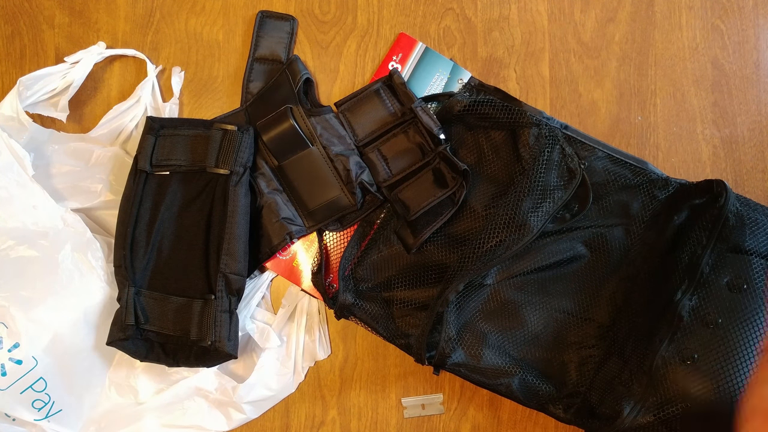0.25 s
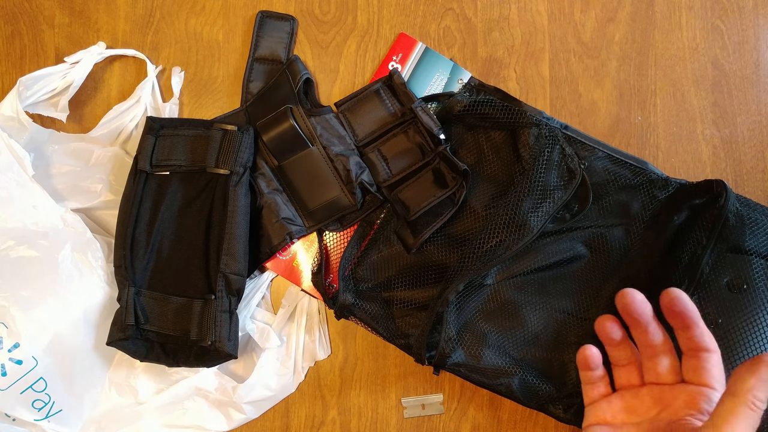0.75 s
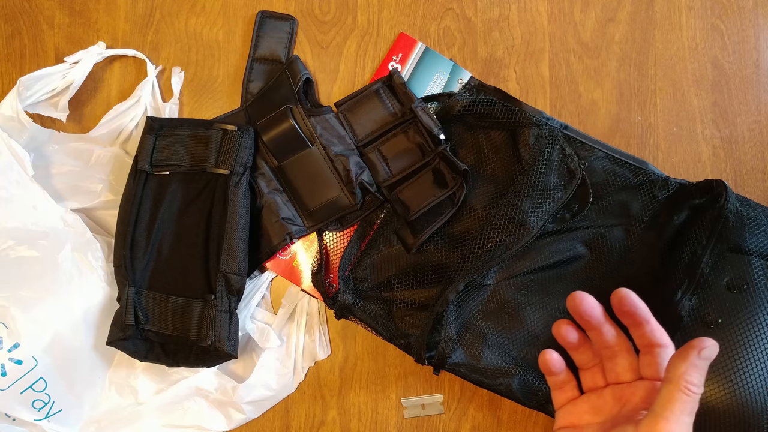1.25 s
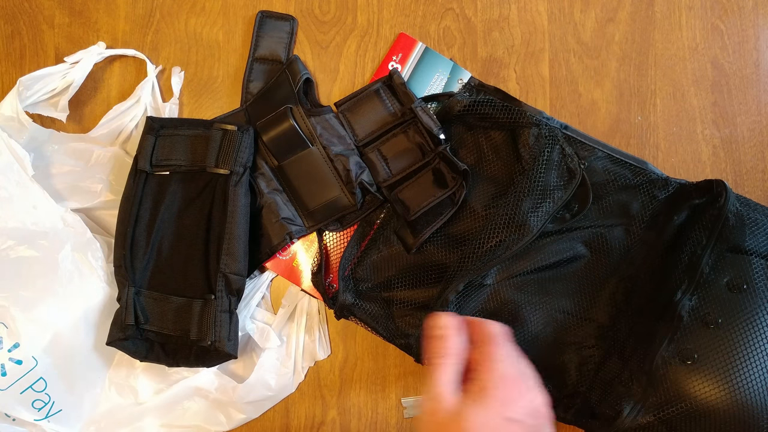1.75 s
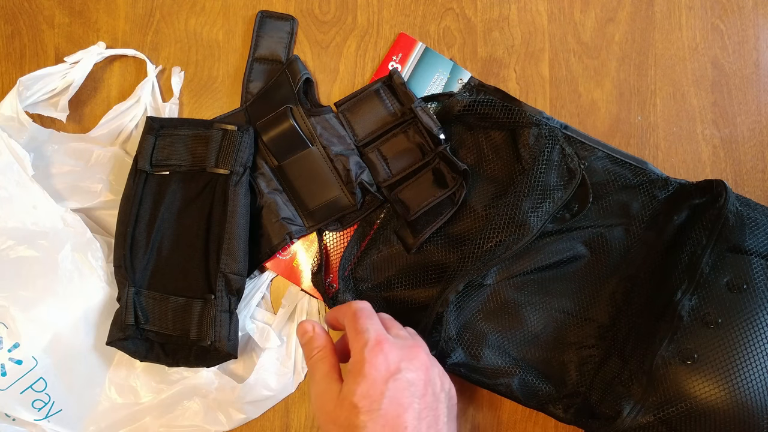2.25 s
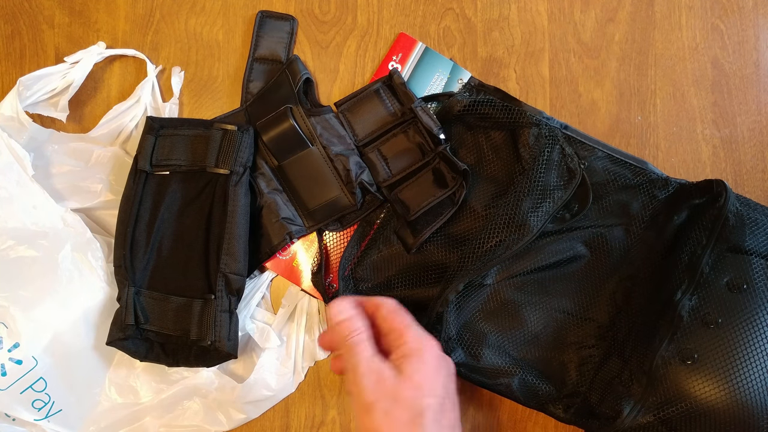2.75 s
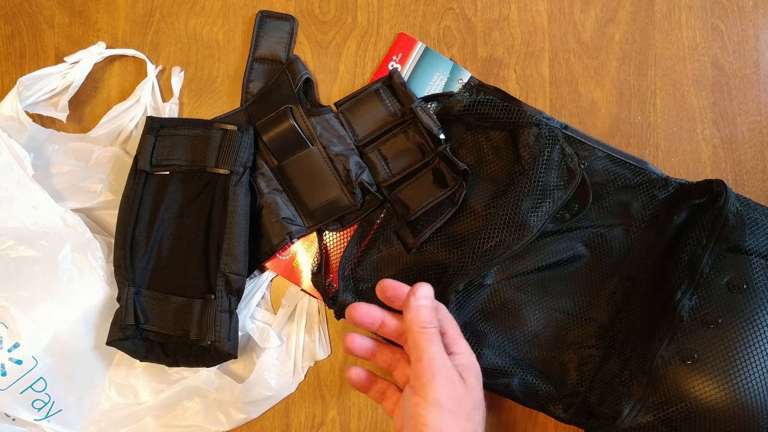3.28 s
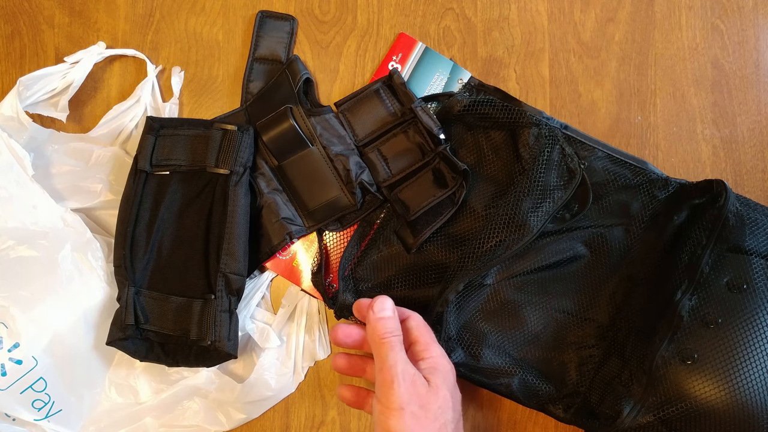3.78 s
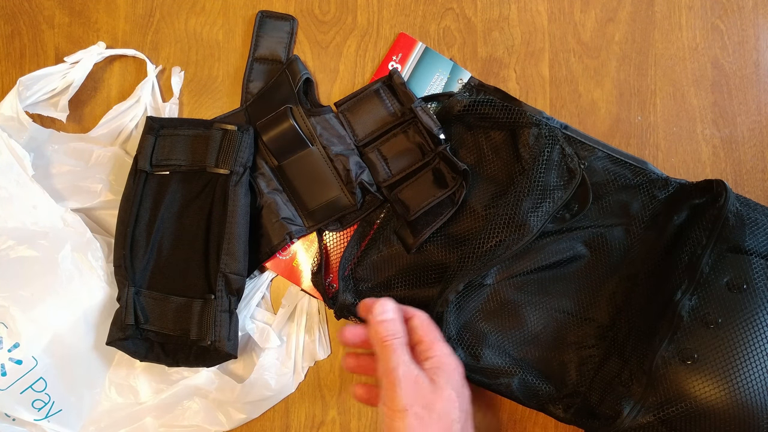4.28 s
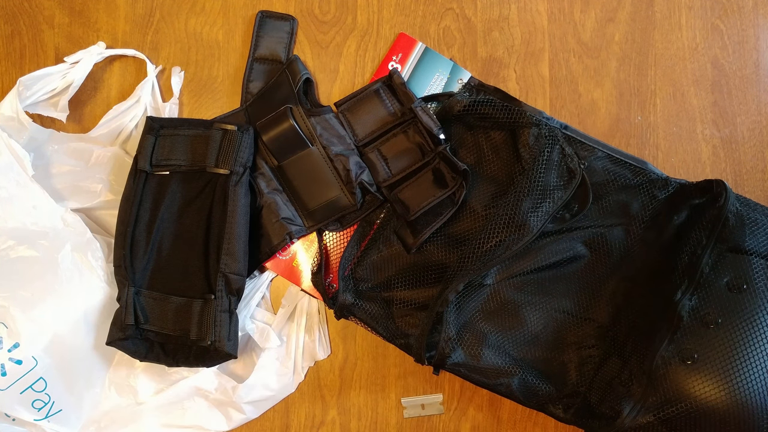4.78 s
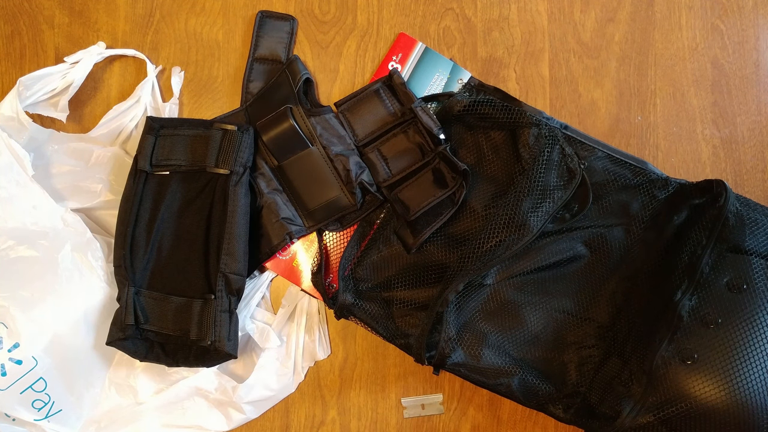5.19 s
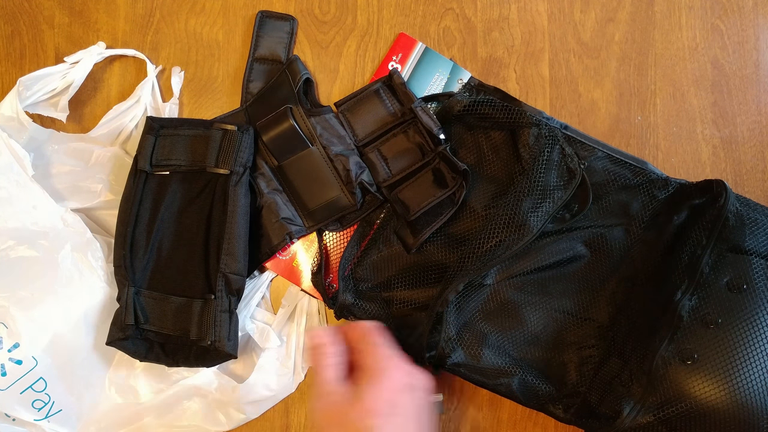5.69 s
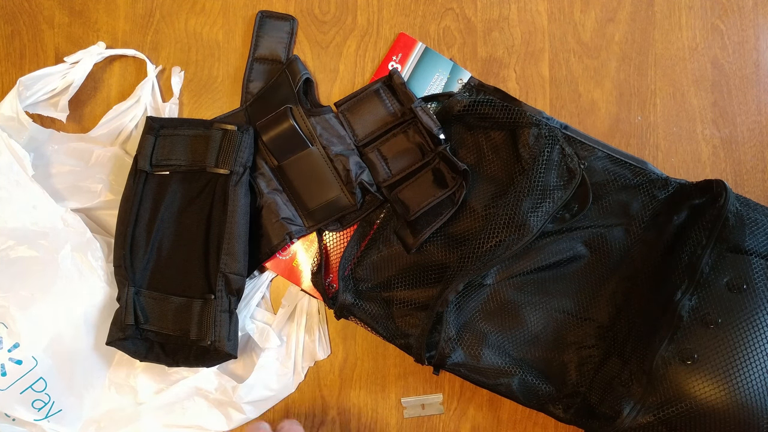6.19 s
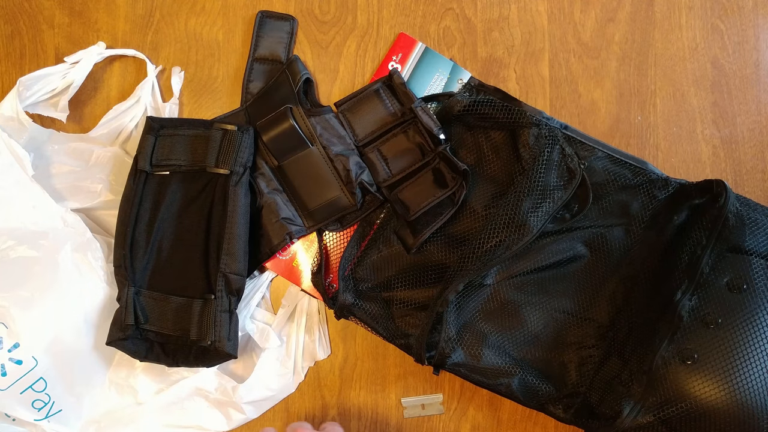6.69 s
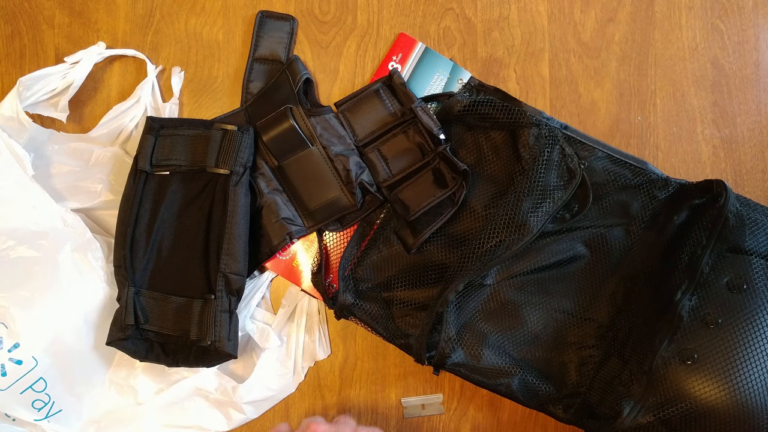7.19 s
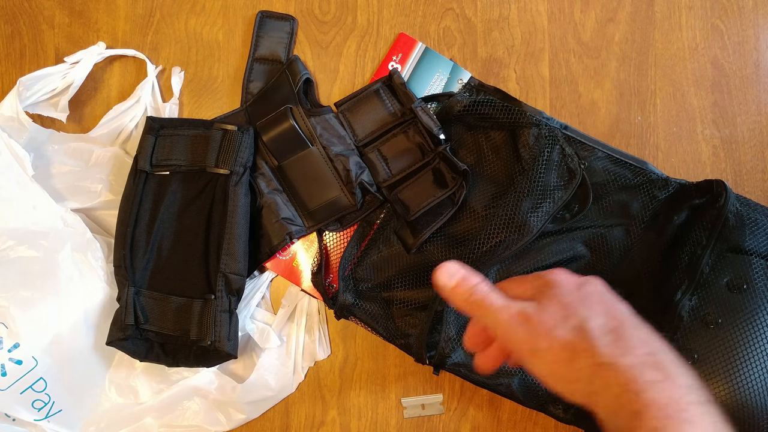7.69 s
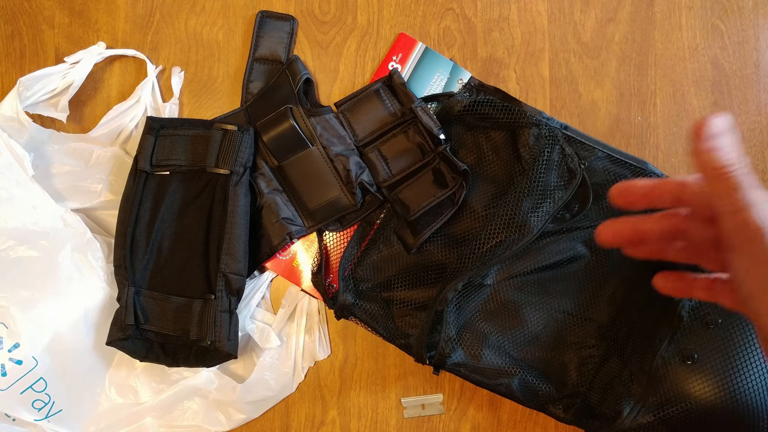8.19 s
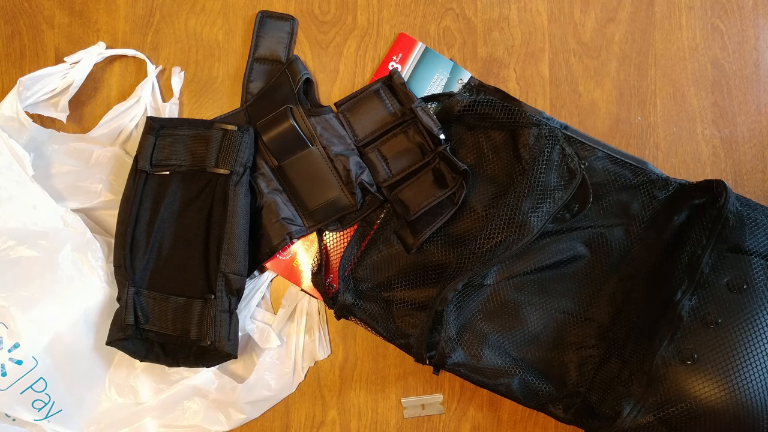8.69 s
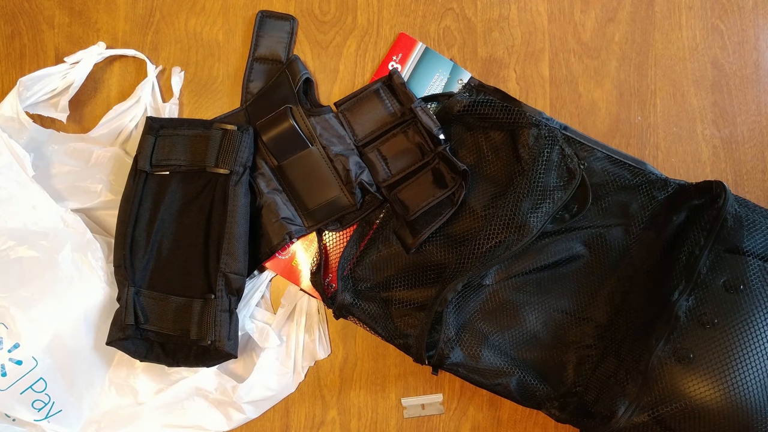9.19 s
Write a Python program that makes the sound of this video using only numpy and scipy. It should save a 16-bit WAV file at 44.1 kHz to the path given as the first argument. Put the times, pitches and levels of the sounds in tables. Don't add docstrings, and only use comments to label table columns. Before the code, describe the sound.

A small quiet room with a very faint low appliance hum, heard in close stereo. From 0 s, a brief soft rustle with tiny ticks, then near quiet with sparse clicks. Around 1.5-2.1 s, padded fabric rustles, dull table bumps and small snaps. At about 2.7 s a hook-and-loop strap rips open: a loud, bright, dense crackle with a padded boom, thinning by 2.95 s, then a sharp final snap at 3.04 s. A lone crisp tick comes at 3.3 s and a faint crackly pull near 4.1 s. From 4.4 to 7.3 s, soft cloth shuffles continue with faint thuds and creases ticking, one clearer at 7.0 s. Fingers hiss lightly over mesh near 7.4 s; a hard bright snap strikes at 7.8 s. Gentle rustling follows, a quick cluster of ticks at 8.85 s, a dull knock at 9.1 s, then fading cloth.

```python
import sys
import numpy as np
from scipy import signal
from scipy.fft import rfft, irfft
from scipy.io import wavfile
from scipy.ndimage import uniform_filter1d, map_coordinates

SR = 44100
rng = np.random.default_rng(int(sys.argv[2]) if len(sys.argv) > 2 else 0)


def linear_from_db(decibels):
    return 10 ** (np.asarray(decibels, float) / 20)


def transcribe(signal):
    frames = np.atleast_2d(signal).T
    limited = np.clip(frames, -1, 1)
    pcm = np.round(limited * 32767).astype(np.int16)
    wavfile.write(sys.argv[1], SR, pcm)


N = 416744

# f/Hz, level/dB, waver/dB
HUM_LINES = [(58, -56.5, 0.6), (96, -59.5, 3), (115, -56, 0.13), (172.7, -64.5, 2.7), (176.6, -60.5, 2.5),
             (232, -73, 2.5)]
# f/Hz, level/dB
AIR_COLOUR = [(25, -41.5), (45, -17.5), (70, -9.5), (130, -9), (210, -18.5), (460, -24), (900, -32),
              (1300, -38.5), (2300, -42), (7000, -50), (14000, -53.5)]
AIR_DB = -59.5
# f/Hz, t60/s, level/dB
ROOM_DECAY = [(250, 0.41, -20.5), (1490, 0.17, -12.5), (4000, 0.2, -15.5), (9210, 0.24, -17),
              (13900, 0.25, -20.5)]
DRIFT_S = .00013
# f/Hz, level/dB
PORT_RESPONSE = [(100, -0.5), (6500, 3), (7800, 5.5), (9000, 14.5), (9900, 8), (10800, -2), (12500, 4.5),
                 (14200, 0), (14900, -26), (16000, -62)]

# t/s, peak/dB, f/Hz
KNOCKS = [(0.31, -57.5, 350), (1.524, -46.5, 106), (1.701, -38, 110), (1.706, -36, 610), (1.71, -43.5, 333),
          (1.765, -44, 740), (1.806, -49, 109), (5.88, -46.5, 55), (5.9, -49, 256), (6.92, -47, 260),
          (9.18, -44, 800), (9.19, -42, 200), (4.001, -48, 70), (6.601, -48, 218.5), (9.116, -31, 440),
          (9.116, -40, 800), (9.116, -32, 120), (9.154, -37, 780)]
# t/s, level/dB, hiss f/Hz
SCRAPES = [
    [(0.45, -67, 3280), (0.592, -63, 3120), (0.68, -79, 3200)],
    [(7.36, -71, 2230), (7.408, -47.5, 2255), (7.5, -63, 2320)],
    [(7.64, -37, 2505), (7.646, -56.5, 2460), (7.785, -49, 3610)],
    [(8.2, -64, 3280), (8.318, -47, 3040), (8.4, -78, 3090)],
    [(8.83, -63, 2080), (8.875, -48.5, 2276), (8.93, -85, 2315)],
    [(9.22, -59, 2710), (9.322, -51, 2530), (9.38, -70, 2500)],
]

# peak t/s, level/dB, rise/s, fall/s, folds re
# level/dB
STROKES = [(0.029, -40, 0.02, 0.064, -19.5), (0.119, -46, 0.043, 0.14, -13.5),
           (0.318, -58, 0.087, 0.056, 2), (0.6, -63, 1, 0.3, -14), (0.94, -65.5, .03, 0.038, -10),
           (1.045, -62, 0.03, 0.093, -54), (1.35, -67.5, .008, 0.14, -22),
           (1.552, -49, 0.072, 0.1, -17), (1.713, -37.5, 0.12, 0.074, -9),
           (1.79, -47, 0.17, 0.047, -4.5), (2.018, -49, 0.076, 0.039, -5.5),
           (2.19, -63.5, 0.12, 0.084, -15), (2.54, -66, 0.0071, 0.18, -31),
           (2.658, -44.5, 0.037, 0.034, -24), (2.718, -48.5, 0.0071, 0.13, -12),
           (3.27, -64.5, 0.1, 0.094, -2), (3.327, -53.5, 0.024, 0.04, -5),
           (1.13, -65.5, 0.051, 0.072, -17), (4.06, -71, .013, 0.095, -27.5),
           (4.139, -46, 0.032, 0.087, -20), (4.38, -57, 0.052, 0.13, -19),
           (4.5, -54, 0.083, 0.2, -27), (4.676, -65, 0.29, 0.14, -0.5),
           (4.968, -55, 0.047, 0.083, -0.5),
           (5.133, -50.5, 0.033, 0.099, -7.5), (5.27, -58, 0.071, 0.26, -8.5),
                 (5.58, -54, 0.1, 0.12, -4), (5.705, -69.5, 0.045, 0.3, 6.5),
                 (5.947, -49.5, 0.097, 0.18, -4), (6.3, -60, 0.091, 0.07, -3),
                 (6.541, -54, 0.15, 0.11, 1.5), (6.73, -63, 0.068, 0.16, -9),
                 (6.871, -63.5, 0.067, 0.17, -6.5), (7.018, -46, 0.046, 0.085, -0.5),
                 (7.185, -50, 0.092, 0.13, -5.5), (7.311, -52.5, 0.064, 0.084, -7),
                 (7.431, -56.5, 0.1, 0.12, -17), (7.635, -56.5, 0.12, 0.31, -5.5),
                 (7.8, -40.5, 0.04, 0.02, -11), (8.015, -63.5, 0.14, 0.31, -11.5),
                 (8.2, -51.5, 0.036, 0.34, -24), (8.317, -43.5, 0.14, 0.093, -11.5),
                 (8.455, -62.5, 0.075, 0.22, -8.5), (8.726, -70.5, 0.012, 0.35, -6.5),
                 (8.885, -56, 0.11, 0.41, -4.5), (9.13, -45, 0.039, 0.27, -7.5), (9.3, -53, 0.44, 0.076, 2),
                 (9.44, -67.5, 0.24, .1, 4.5),
           (.505, -60, .03, .05, -18), (.665, -57, .03, .05, -25), (5.61, -62, .02, .04, 6),
            (6.56, -60, .03, .05, 6), (1.63, -48.5, 0.057, 0.27, -5.5), (4.88, -61.5, 0.049, 0.097, -1),
            (5.03, -61.5, 0.072, 0.12, 0.5), (5.8, -60, 0.12, 0.2, -11), (6.005, -52.5, 0.041, 0.08, -7.5),
            (6.41, -65, 0.071, 0.04, 4.5), (6.665, -70, 0.023, 0.051, 6), (6.93, -68, 0.055, 0.11, 3),
            (7.07, -55, 0.066, 0.074, -21)]
SWING_DB = 20
ROUNDING = 1.05
# level/dB, share of the folds column, stretch of rise and fall
LAYERS = [
    (-3, 1, 1.35),
    (-1, 1, .95),
    (-5, 0, 0.89),
    (-4, 0, 0.84),
]
# t/s, level/dB
PRESSURE = [(0, 2), (1.7, -2.5), (3, -3), (4.6, 2), (5.2, 3), (5.9, 2), (6.5, 0), (6.9, 12.5), (7.0, -0.5),
            (7.4, .3), (8.8, -5), (9.3, -6.5)]

# t/s, peak/dB, strap f/Hz, body/dB, left minus right/dB
STRAY_HOOKS = [(0.021, -27, 4800, -28, -10.5), (0.115, -28, 4540, -23, -3.5), (1.035, -33.5, 7500, -42, 7),
               (1.352, -35, 4400, -38, 7), (1.539, -31, 3820, -23, -8), (1.98, -27, 2760, -39, -2.5),
               (2.005, -21.5, 2870, -31, -7.5), (2.017, -51, 2840, -17, -1), (2.154, -35.5, 5350, -21, 6),
               (2.638, -46, 5000, -35, 1), (2.653, -24, 5700, -50, 3), (3.255, -34.5, 2720, -29.5, 4.5),
               (3.3235, -17, 2977, -36.5, -2), (4.064, -49, 4450, -41, 0.5), (4.093, -46, 5980, -40.5, 0.5),
               (4.105, -34, 6500, -45, 3), (4.1155, -36, 7500, -45, -4), (4.213, -42, 8000, -44.5, 0),
               (6.065, -42, 6030, -30.5, 0), (6.637, -41, 6000, -22, 0.5), (7.733, -34, 3100, -27.5, 1),
               (7.741, -28, 3526, -30, 1), (7.772, -34, 3500, -33, -3), (4.377, -32, 3260, -37.5, -5),
               (4.384, -33.5, 3470, -37, 5)]
HOOK_TREBLE_DB, HOOK_TREBLE_DB_PER_OCTAVE = -14, 10.5
# t/s, peak/dB, strap f/Hz, treble/dB, body/dB
CREASES = [(1.644, -36, 2600, -20, -10), (1.713, -32, 2050, -22, -13), (2.012, -24.5, 1900, -27, -32),
           (4.667, -41, 1630, -22, -9), (4.953, -33, 2280, -11.5, -3), (6.471, -36, 1806, -16, -5),
           (6.498, -32, 1730, -14, -11), (6.653, -40, 1540, -20, 10), (6.849, -36.5, 1994, -7, -10),
           (7.003, -21.5, 1710, -30, -16.5), (7.403, -25, 2420, -35, -23.5), (7.7944, -9, 1700, -14, -15),
           (7.7954, -8, 6300, -12, -22), (8.609, -40, 1940, -27, -28), (8.728, -37.5, 1860, -19, -7),
           (8.8225, -32, 2900, -27, -32), (8.8452, -22, 2020, -38, -26), (8.8603, -22, 2300, -29, -31),
           (8.8704, -18, 3300, -22, -15), (9.103, -23, 1100, -45, -16)]
CREASE_PAN_DB = 1.8

# t/s, level/dB, padding re level/dB
PEEL = [
    (2.738, -29, -41.5),
    (2.752, -24, -35.5),
    (2.77, -16.5, -29.5),
    (2.793, -24, -24.5),
    (2.806, -15.5, -19),
    (2.822, -24.5, -17),
    (2.88, -20, -14.5),
    (2.93, -34.5, -26.5),
    (3.015, -44.5, -18),
]
# f/Hz, level/dB
PEEL_COLOUR = [(250, -15.5), (600, -6.5), (900, -18), (1800, -17), (2900, -10.5), (4000, -10.5),
               (9000, -11.5), (14000, -9)]
# t/s, peak/dB, strap f/Hz, body/dB
SURGES = [(2.764, -4, 5500, -32), (2.770, -3.5, 5500, -29), (2.775, -5, 5000, -30), (2.782, -6, 5000, -30),
          (2.803, -3, 5500, -24), (2.808, -3, 4500, -23), (2.830, -9, 5000, -24), (2.839, -3, 4500, -22),
          (2.869, -4, 4200, -19), (3.0415, -4, 3600, -30), (4.1325, -22.5, 6400, -40),
          (4.1365, -24, 5200, -38), (4.140, -25, 5200, -38), (4.148, -30, 5000, -38),
          (1.48, -49, 5200, -30), (7.7938, -17, 6000, -34), (0.66, -46, 5600, -36)]
SURGE_TREBLE_DB, SURGE_PAN_DB = -5.5, -0.6
# t/s, peak/dB, strap f/Hz, treble/dB, left minus right/dB
TEARS = [(2.7347, 2, 5310, -18, -3), (2.7411, -4.5, 4247, -12, -3.5), (2.7425, -4, 5290, -11.5, -2),
         (2.753, 0, 5950, -11, -1), (2.7613, -2, 5800, -10.5, -2), (2.7628, -3, 5846, -9.5, -1.5),
         (2.7645, -4.5, 5500, -9.5, -1.5), (2.7683, -2, 5470, -10.5, -2), (2.7745, -4.5, 5200, -10.5, -0.5),
         (2.7805, -4.5, 5200, -11, 0), (2.7979, -2, 4504, -10, -3), (2.7995, -4, 5470, -9.5, -0.5),
         (2.801, -3.5, 5655, -8.5, 3), (2.8098, -3, 4500, -11.5, -1.5), (2.8114, -6.5, 5296, -11.5, -4),
         (2.8294, -7.5, 5012, -8, 1), (2.8352, -4.5, 5000, -10, -1), (2.8412, -3.5, 4170, -12, 0.5),
         (2.8498, -6, 5280, -9.5, 1), (2.8529, -2, 3900, -13, 0), (2.8652, -6, 4500, -12, -2.5),
         (2.8722, -6.5, 4520, -12, -0.5), (2.8844, -11, 2560, -21, -1.5), (2.9134, -13.5, 2650, -18, -2),
         (2.9347, -11.5, 3000, -14.5, 1), (2.9831, -23.5, 2870, -15.5, 0.5), (3.0376, -8.5, 3600, -14, 2),
         (3.0407, -3, 5600, -6, -0.5), (3.0414, 2, 4200, -9, -1.5), (3.0421, 2, 6020, -8, -3),
         (3.0427, -6, 1600, -14, 0.7)]
# t/s, level/dB
TEAR_BODY = [
    (2.735, -43),
    (2.765, -31.5),
    (2.84, -27.5),
    (2.865, -18),
    (2.92, -26),
    (3.04, -29),
]


def colour(x, points):
    hz, db = np.transpose(points)
    grid_hz = np.maximum(np.fft.rfftfreq(8192, 1 / SR), 1)
    log_gain = np.interp(np.log(grid_hz), np.log(hz), db) * np.log(10) / 20
    ceps = irfft(log_gain)
    ceps = np.r_[ceps[0], 2 * ceps[1:4096], np.zeros(4096)]
    response = irfft(np.exp(rfft(ceps)))
    return signal.oaconvolve(x, response[None], axes=1)[:, :x.shape[1]]


def band(x, lo_hz, hi_hz, order=2):
    edges_hz = [lo_hz, min(hi_hz, .45 * SR)]
    return signal.sosfilt(signal.butter(order, edges_hz, "band", fs=SR, output="sos"), x)


def split(x, edges_hz):
    n = x.shape[-1]
    octave = np.log2(np.fft.rfftfreq(n, 1 / SR) + 1)
    spec = rfft(x)
    above = [.5 + .5 * np.tanh((octave - np.log2(hz)) * 4) for hz in edges_hz] + [0]
    return [irfft(spec * (lo - hi), n) for lo, hi in zip(above, above[1:])]


def unit(x):
    return x / np.sqrt(np.mean(x ** 2))


def walk(rate_hz):
    k = int(SR / rate_hz)
    return uniform_filter1d(np.repeat(rng.standard_normal(N // k + 1), k), k)[:N]


def curve(rows, column):
    rows = np.array(rows)
    db = rows[:, 1] + (rows[:, column] if column > 1 else 0)
    s = np.r_[rows[:, 0], rows[-1, 0] + .025]
    return linear_from_db(np.interp(np.arange(N) / SR, s, np.r_[db, db[-1]], left=-200, right=-200))


def grains(rate_hz, spread_db, alike):
    size_db = spread_db * np.minimum(rng.exponential(size=(3, N)), 3)
    hit = rng.random((3, N)) < rate_hz / SR
    snap = hit * (2 * rng.random((3, N)) - 1) * linear_from_db(size_db)
    alike = np.clip(alike, 0, 1)
    return unit(np.sqrt(alike) * snap[0] + np.sqrt(1 - alike) * snap[1:])


def add(out, s, sound, pan_db):
    for port, side in zip(out, (1, -1)):
        i = int(s * SR - 0.9 * side * pan_db)
        port[i:i + len(sound)] += linear_from_db(side * pan_db / 2) * sound


def bursts(events, rate_hz, ms, lead, width):
    out, t = np.zeros((2, N)), np.arange(-512, 512) / SR
    swell = np.exp(-(1000 * t / ms) ** 2)
    chance = rng.random((len(events), 2, len(t)))
    for (s, db, hz, treble_db, body_db, pan_db), (when, size) in zip(events, chance):
        snaps = (when < rate_hz / SR) * (2 * size - 1) * swell
        snaps = snaps + lead * (t == 0)
        lo_hz, hi_hz = hz / width, hz * width
        edges_hz = (480, min(2400, lo_hz / 1.1), lo_hz, hi_hz, max(6500, hi_hz * 1.1))
        body, skirt, strap, upper, treble = split(snaps, edges_hz)
        low, high = linear_from_db(body_db + 17), linear_from_db(treble_db + 2.5)
        mix = low * body + np.sqrt(low) * skirt + strap
        mix = mix + np.sqrt(high) * upper + high * treble
        add(out, s + t[0] + .0017, linear_from_db(db) * mix / abs(mix).max(), pan_db)
    return out


def hum():
    t, port = np.arange(N) / SR, np.array([[1], [-1]])
    lines = 0
    for hz, db, waver_db in HUM_LINES:
        gain = linear_from_db(db + 3 + waver_db * walk(5))
        cycles = hz * t + .08 * walk(4) + rng.random()
        lines = lines + gain * np.sin(2 * np.pi * cycles + .15 * port)
    mid, side = colour(rng.standard_normal((2, N)), AIR_COLOUR)
    side = 0.18 * side + 0.67 * band(side, 250, 18000)
    return lines + linear_from_db(AIR_DB) * (mid + port * side) / np.std(mid)


def room(x):
    t, tail = np.arange(SR // 2) / SR, 0
    hz, t60, db = np.transpose(ROOM_DECAY)
    for f in 250 * 2 ** np.arange(0, 6.1, .5):
        level_db = np.interp(np.log(f), np.log(hz), db)
        t60_s = np.interp(np.log(f), np.log(hz), t60)
        noise = band(rng.standard_normal((2, len(t))), f / 2 ** .25, f * 2 ** .25)
        tail = tail + linear_from_db(level_db - 60 * t / t60_s) * noise
    tail = tail * np.clip((t - .004) / 0.0026, 0, 1) * linear_from_db(-17.0)
    echoes = signal.oaconvolve(x[:1], tail, axes=1)[:, :N]
    late = np.arange(N) - DRIFT_S * SR * uniform_filter1d(walk(500), 50)
    return np.array([map_coordinates(port, [late], order=3, mode="mirror") for port in echoes])


def thuds():
    out, t = np.zeros((2, N)), np.arange(8192) / SR
    for (s, db, hz), noise in zip(KNOCKS, rng.standard_normal((len(KNOCKS), len(t)))):
        push = noise * np.exp(-t * hz / 12.0)
        push = push + 2.5 * np.sqrt(SR / hz) * (t == 0)
        knock = band(push, hz / 1.62, hz * 1.39)
        add(out, s, linear_from_db(db) * knock / abs(knock).max(), 0)
    return out


def scrape():
    s, _, hz = np.concatenate(SCRAPES).T
    low_pass = signal.butter(2, 650, fs=SR, output="sos")
    rough = unit(signal.sosfilt(low_pass, grains(rate_hz=2500, spread_db=5.0, alike=0.4)))
    pitch_hz = np.interp(np.arange(N) / SR, s, hz)
    carrier = np.cos(2 * np.pi * np.cumsum(pitch_hz) / SR)
    gain = uniform_filter1d(sum(curve(rows, column=1) for rows in SCRAPES), 900)
    return linear_from_db(-1.0) * rough * carrier * gain


def strokes(share, stretch):
    rows = np.array(STROKES)
    s, db, rise, fall, folds_db = rows.T[..., None]
    t = np.arange(0, N, 64) / SR
    before, after = (s - t) / np.maximum(rise, .002), (t - s) / np.maximum(fall, .002)
    away = np.maximum(before, after) / stretch
    level_db = db + share * folds_db - SWING_DB * away ** ROUNDING
    power = np.sum(linear_from_db(level_db) ** 2, axis=0)
    return np.interp(np.arange(N) / SR, t, np.sqrt(power))


def cloth():
    fibres = grains(rate_hz=5000, spread_db=1.0, alike=0.27) + 0.33 * rng.standard_normal((2, N))
    fibres = fibres + 0.22 * grains(rate_hz=81, spread_db=2.5, alike=0.67)
    bands = split(fibres * linear_from_db(2.1 * walk(60)), (300, 1100, 2800, 6500))
    gains = [strokes(share, stretch) for _, share, stretch in LAYERS]
    gains[0] = gains[0] * linear_from_db(np.interp(np.arange(N) / SR, *np.transpose(PRESSURE)))
    gains[:2] = [gain * linear_from_db(2.2 * walk(45)) for gain in gains[:2]]
    rustle = sum(unit(b) * linear_from_db(db) * gain for b, (db, _, _), gain in zip(bands, LAYERS, gains))
    weight = gains[0] + linear_from_db(-4.5) * curve(PEEL, column=2)
    rumble = unit(band(fibres.sum(0), 75, 180))
    return rustle + linear_from_db(-1.5) * uniform_filter1d(weight, 3000) * rumble


def ticks():
    events = []
    for s, db, hz, body_db, pan_db in STRAY_HOOKS:
        treble_db = HOOK_TREBLE_DB + HOOK_TREBLE_DB_PER_OCTAVE * np.log2(hz / 4500)
        events.append((s, db, hz, treble_db, body_db, pan_db))
    events += [(*row, CREASE_PAN_DB) for row in CREASES]
    return linear_from_db(-2) * bursts(events, rate_hz=5000, ms=.4, lead=4., width=1.45)


def peel():
    hooks = grains(rate_hz=5500, spread_db=3.3, alike=.4) * linear_from_db(2.2 * walk(160))
    padding = unit(band(hooks, 180, 1200)) * curve(PEEL, column=2)
    pops = unit(band(colour(hooks, PEEL_COLOUR), 830, 19000, order=1)) * curve(PEEL, column=1)
    return linear_from_db(-4) * pops + linear_from_db(-6) * padding


def patches():
    events = [(s, db, hz, SURGE_TREBLE_DB, body_db, SURGE_PAN_DB) for s, db, hz, body_db in SURGES]
    return linear_from_db(-3) * bursts(events, rate_hz=20000, ms=2.4, lead=.6, width=1.8)


def tearing_rows():
    events = []
    for s, db, hz, treble_db, pan_db in TEARS:
        body_db = np.interp(s, *np.transpose(TEAR_BODY))
        events.append((s, db, hz, treble_db, body_db, pan_db))
    return linear_from_db(-1) * bursts(events, rate_hz=12000, ms=.5, lead=3.5, width=1.6)


def scene():
    bed = hum() + scrape() + cloth()
    hits = thuds() + ticks() + peel() + patches() + tearing_rows()
    return hits + room(hits) + bed


def band_limit(x):
    return signal.sosfilt(signal.butter(12, 15700, fs=SR, output="sos"), x)


def record(dry):
    heard = .9 * np.tanh(colour(dry, PORT_RESPONSE) / .9)
    heard = signal.sosfilt(signal.ellip(8, .2, 60, 15200, fs=SR, output="sos"), heard)
    return band_limit(heard)


dry = scene()
out = record(dry)
transcribe(out)
```